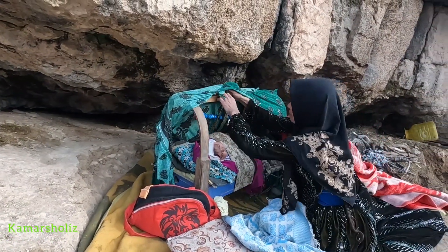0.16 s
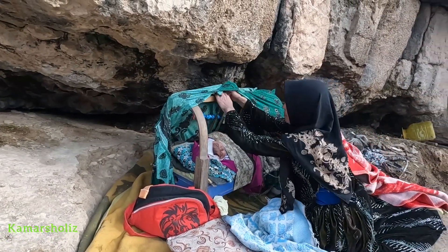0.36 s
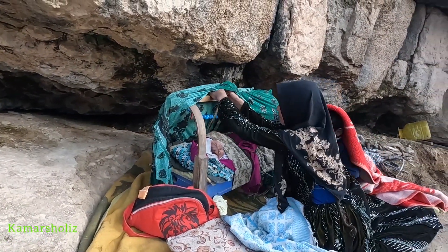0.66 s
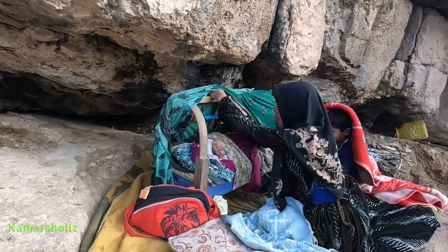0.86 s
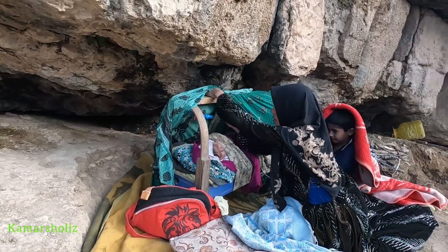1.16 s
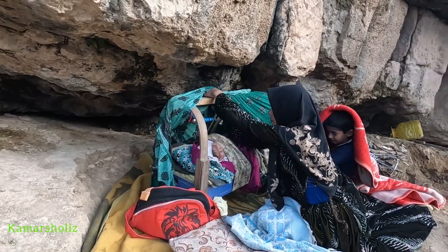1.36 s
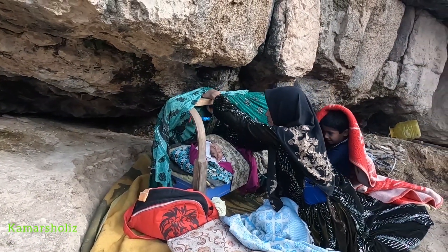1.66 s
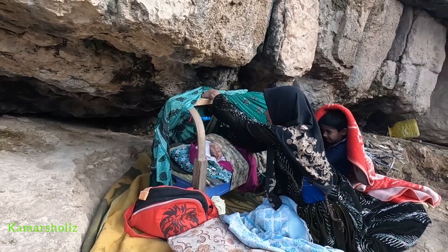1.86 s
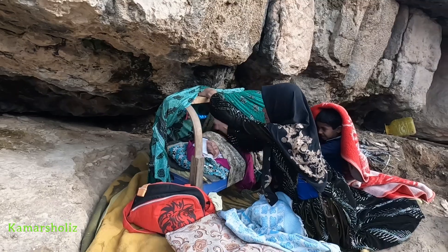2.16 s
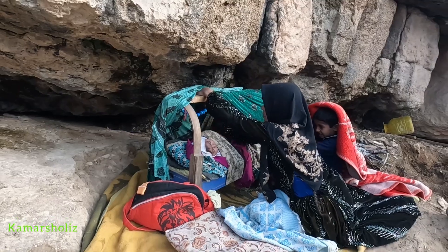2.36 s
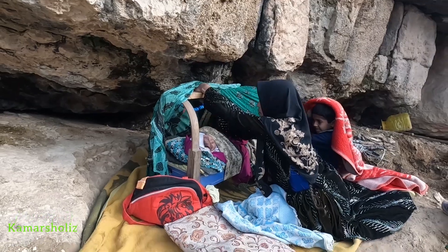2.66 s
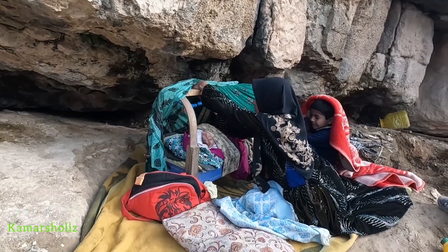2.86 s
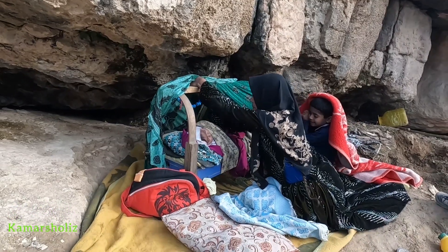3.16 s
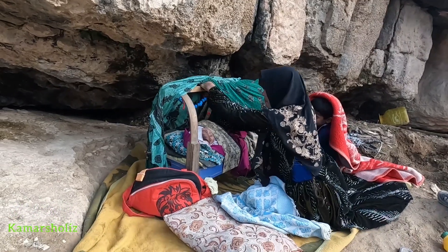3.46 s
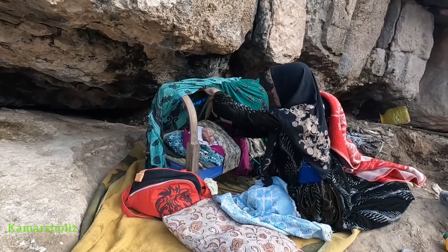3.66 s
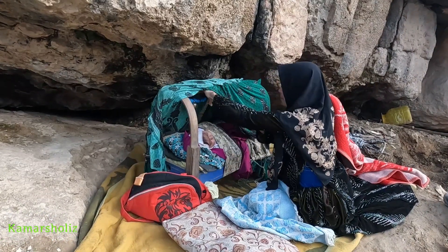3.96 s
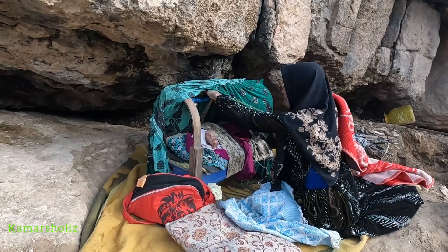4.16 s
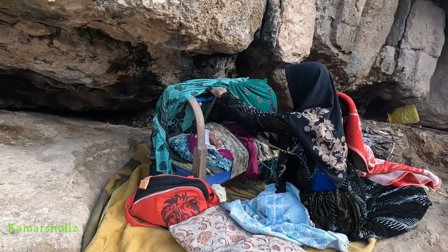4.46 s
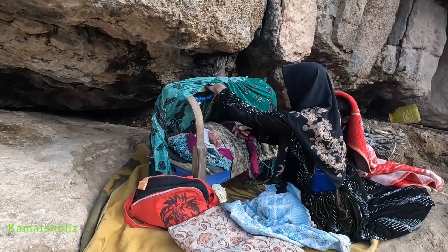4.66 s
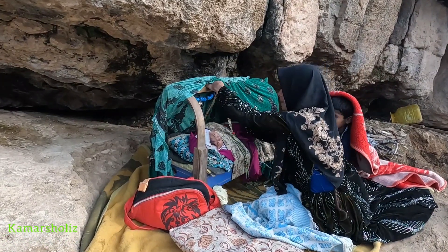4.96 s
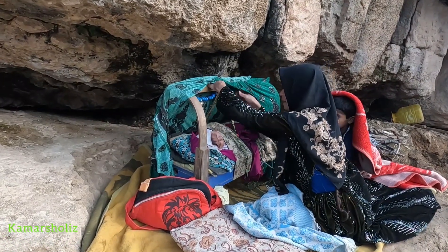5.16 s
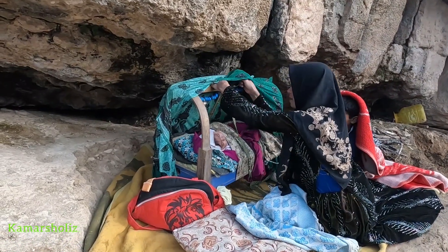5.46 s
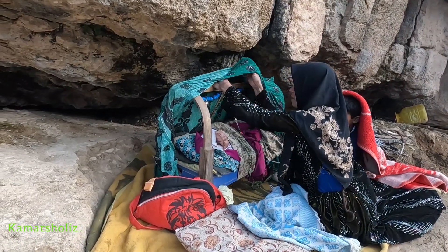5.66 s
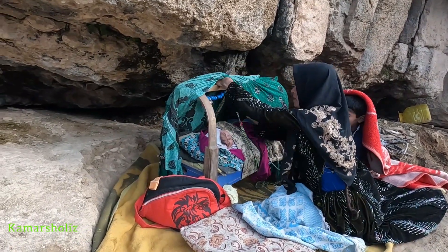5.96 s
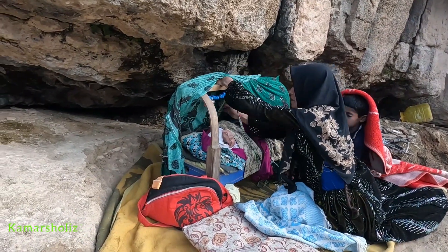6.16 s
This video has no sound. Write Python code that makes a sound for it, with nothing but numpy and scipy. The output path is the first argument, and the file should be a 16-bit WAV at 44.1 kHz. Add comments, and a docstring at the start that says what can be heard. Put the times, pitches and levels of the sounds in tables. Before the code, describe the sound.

A small brass bell clinks brightly in handling hands, wooden frame knocks and small hard clacks around it, cloth rustling, wind rumbling among rocks.

```python
"""Outdoors among rocks, a small brass bell swings in someone's hands.
The clapper rings five split partials, each a pair of beating sines, and fingers choke some blows.
A wooden frame knocks with a pop and ringing modes, small hard things clack as short tones with scratch,
and soft low thumps are decaying sines. Cloth rustles in jerks of filtered noise, the rocks return a short
tail, wind rumbles and puffs on the two microphone ports, and a far hiss lies under it all."""
import sys
import numpy as np
from scipy import signal
from scipy.fft import rfft, irfft
from scipy.io import wavfile
from scipy.ndimage import uniform_filter1d

SR = 44100
rng = np.random.default_rng(int(sys.argv[2]) if len(sys.argv) > 2 else 0)


def int16_out(signal):
    """Quantize to a 16-bit WAV file."""
    q = np.round(np.clip(np.atleast_2d(signal).T, -1, 1) * 32767)
    wavfile.write(sys.argv[1], SR, q.astype(np.int16))


N = 278271  # length [samples]

# cloth movement: (time [s], level [dB], level of its treble [dB], level of the duller rub under it [dB])
RUSTLE = [(0.0, -59, -58.5, -78), (0.24, -76, -75.5, -74), (0.77, -79, -73, -78), (1.12, -71.5, -69.5, -74),
          (1.56, -75.5, -82, -81), (1.76, -59.5, -94, -80), (1.98, -72, -75, -95), (2.16, -75, -60, -66),
          (2.32, -65, -61.5, -69.5), (2.48, -56, -53, -72), (2.58, -58, -68, -64),
          (2.92, -72.5, -81, -92.5), (3.23, -75.5, -73, -77), (3.64, -59.5, -62.5, -64.5),
          (3.81, -53.5, -58.5, -63.5), (4.04, -55, -62.5, -69.5), (4.24, -62.5, -64, -76),
          (4.44, -71, -82, -71), (4.66, -76, -77.5, -80), (4.94, -78.5, -80.5, -79),
          (5.29, -72, -79.5, -68), (5.71, -80, -82, -73), (5.87, -63, -66, -67), (5.99, -56.5, -71, -62.5),
          (6.13, -59.5, -63, -79), (6.31, -63, -64, -66)]


def undb(db):
    """Turn decibels into gain."""
    return 10 ** (np.asarray(db) / 20)


def unit(x):
    """Scale to an RMS of 1, over all channels together."""
    return x / np.sqrt(np.mean(x ** 2))


def sides(pan_db):
    """Left and right gains from a left minus right difference [dB]."""
    return undb(np.array([pan_db, -pan_db]) / 2)


def curves(table):
    """Draw each column of a table as a line over the whole scene."""
    s, *columns = np.transpose(table)
    return [np.interp(np.arange(N) / SR, s, column) for column in columns]


def colour(x, points):
    """Shape the spectrum by (frequency [Hz], gain [dB]) points."""
    hz, db = np.transpose(points)
    f = np.arange(x.shape[-1] // 2 + 1) * SR / x.shape[-1] + 1
    gain = undb(np.interp(np.log(f), np.log(hz), db))
    return irfft(rfft(x) * gain, x.shape[-1])


def fade(t, t60):
    """Exponential decay by 60 dB in t60 seconds, never under 3 ms."""
    return undb(-60 * t / np.maximum(t60, .003))


def walk(rate):
    """Random levels, rate of them per second, joined by straight ramps; RMS near 1."""
    k = int(SR / rate)
    steps = np.repeat(rng.standard_normal(N // k + 1), k)
    return unit(uniform_filter1d(steps, k)[:N])


def add(out, s, sound, pan_db):
    """Mix a short sound in at time s."""
    i = max(int(s * SR), 0)
    sound = sound[:N - i]
    out[:, i:i + len(sound)] += sides(pan_db)[:, None] * sound


def bell():
    """Each blow stills the old ring and starts beating twins, whose mix shifts as the bell spins."""
    # clapper blows: (time [s], finger damping [dB/s, sign ignored], spin of the bell [turns/s],
    # then level [dB] and lean [turns] for each of the four lower pairs, left minus right [dB])
    # the lean is where the blow falls on the rim: 0 rings the lower twin alone, +-.25 the upper one
    strikes = [(0.0, -5, 0.13, -46.5, 0.23, -35.5, -0.22, -46.2, 0.22, -49.5, -0.34, 0),
               (1.176, 391, -0.89, -19.5, -0.19, -10, -0.13, -19, -0.17, -33.5, 0.085, 0),
               (1.265, 122, -0.052, -37, 0.13, -28.5, 0.17, -33.6, 0.022, -40, -0.35, 1.0),
               (1.344, 80.0, 0.1, -44.5, 0.213, -33.5, 0.18, -40, -0.21, -49.5, 0.15, 1.5),
               (1.44, 68, 0.022, -58, 0.225, -37, 0.16, -54.5, 0.16, -67, 0.28, 1.4),
               (1.599, -3, -0.15, -37, -0.17, -24.5, 0.064, -32.5, 0.0051, -35, 0.238, 1),
               (1.895, 2, -0.23, -62.5, -0.076, -37.5, 0.022, -50, 0.25, -53.5, 0.43, 1),
               (2.141, -2, -0.1, -51.5, 0.13, -38, -0.075, -48, -0.04, -55, -0.21, 4),
               (2.197, 61, -0.13, -47, -0.27, -33, -0.17, -42.5, -0.18, -46, -0.24, 1.5),
               (2.373, 400.0, 0.27, -47, 0.02, -25.5, -0.064, -35, -0.025, -39.5, -0.15, 1),
               (2.494, 80.0, -0.49, -44.5, 0.077, -36, -0.162, -40.5, 0.11, -51.0, 0.05, 0),
               (2.578, 400.0, -0.66, -33.5, 0.036, -17.3, -0.17, -19, -0.18, -33, 0.047, 1.5),
               (2.638, 265, -0.052, -38.5, -0.14, -24, -0.21, -33, -0.21, -40.5, -0.037, 3.5),
               (2.721, 80.0, -0.26, -57, 0.13, -46, -0.21, -53.5, -0.21, -58, -0.187, 3.5),
               (2.85, 186, 0.14, -65, 0.188, -35.5, -0.047, -48.5, -0.063, -60, 0.0024, 1),
               (2.984, 1, -0.11, -75, -0.25, -76.5, -0.32, -72.5, 0.054, -75, -0.025, 7.5),
               (3.645, 41, 0.18, -53, -0.36, -40, 0.14, -42, -0.28, -56, 0.225, -1.4),
               (3.996, 28, 0.3, -43.5, 0.17, -37.5, -0.0011, -52.5, 0.078, -61.5, 0.013, 1.7),
               (4.192, 20, 0.13, -39, -0.25, -33, 0.14, -43.5, -0.25, -38, -0.25, 1.5),
               (4.602, 50, -0.016, -55.5, -0.22, -31.5, -0.24, -44.5, -0.23, -45.5, -0.01, -1),
               (5.085, 261, 0.086, -49.5, 0.087, -52.5, -0.3, -62, 0.1, -77, 0.0, -0.5),
               (5.22, 904.5, 0.33, -31, -0.43, -23, -0.39, -31.5, -0.187, -32, 0.077, -0.1),
               (5.343, 598, -0.29, -35.5, 0.0, -23.5, -0.0039, -26.5, 0.033, -37.5, -0.14, 0),
               (5.403, 900.0, -0.0, -50, 0.025, -22, -0.17, -30, 0.058, -45, -0.125, -2.1),
               (5.43, 900.0, 0.45, -58, 0.1, -33, -0.26, -35.5, 0.19, -45, 0.041, -2.5),
               (5.469, 902, -0.0, -57, -0.22, -42, 0.13, -43, 0.23, -44.5, -0.16, 2),
               (5.676, -1.5, -0.0, -49, -0.015, -56.5, 0.028, -54, -0.25, -74, 0.2, -0.5),
               (5.765, 55.0, -0.0, -43, 0.22, -51, -0.3, -56.5, -0.043, -80, 0.125, -1.0),
               (5.796, 40, -0.16, -37, -0.11, -27.5, -0.093, -28, 0.025, -36.5, -0.2, -1.5),
               (5.886, 6, -0.25, -37.5, -0.12, -22.5, -0.25, -32.5, -0.031, -44.5, -0.22, -0.5),
               (6.051, 10.0, -0.12, -32, 0.22, -23.5, -0.061, -27, -0.2, -35.5, -0.28, -0.5),
               (6.231, 13, 0.016, -45, 0.2, -26, -0.011, -32.5, 0.038, -46, 0.027, -1.5)]
    # split partials: (lower twin [Hz], upper twin [Hz], t60 [s], waves round the rim, extra left minus right [dB])
    twin_modes = [(2105.5, 2149.5, .9, 2, 0.5), (5827, 5839.5, 1.6, 3, 0), (9275, 9293.5, .6, 4, 4),
                  (10518, 10555, .52, 5, 6), (13440, 13480, .42, 5, 5)]
    # weak single partials: (frequency [Hz], level against the top pair's drive [dB], t60 [s])
    single_modes = [(7180, -12, .1), (7510, -10, .1), (11550, -14, .1), (12050, -12, .12),
                    (12210, -12, .15), (12310, -7, .2), (12480, -6, .12), (12620, -12, .1), (14090, -4, .3),
                    (14708, -3, .45), (14725, -7, .35)]
    # clapper contact: (frequency [Hz], gain [dB])
    tick_colour = [(1300, -17), (2200, -3), (4000, -9.5), (7000, 3.5), (11000, -8), (13000, -20),
                   (15500, -44)]
    # loose ring and chain: (frequency [Hz], gain [dB])
    jangle_colour = [(1500, -24.5), (2500, 1.5), (4500, -9.5), (7500, -6.5), (10000, -25), (12300, 8.5),
                     (13500, -30), (15500, -40)]
    # the mouth of the swinging bell turns to the microphone and away: (time [s], level [dB])
    mouth = [(0.05, 1.5), (.15, -0.5), (.27, -3), (.4, -15), (1.3, 1.5), (1.47, -1), (1.56, 0), (1.62, 0.5),
             (1.67, 1.5), (1.75, -2), (1.85, -6.5), (1.97, 3), (2.1, -1.5), (2.25, 1), (2.33, 1),
             (2.5, 0.5), (3.7, 0.5), (3.85, -7.5), (4.08, 2), (4.27, -6.5), (4.42, -2.5), (4.56, 2.5),
             (4.72, -1.5), (4.9, 3.5), (5.1, -2), (5.8, -2), (5.9, -2), (5.96, 0), (6.03, -3), (6.11, -3),
             (6.2, -2), (6.3, -0.5)]
    # unsteadiness of each pair, more for finer lobes: (one RMS level per pair [dB])
    flicker = (1, 1, 1.5, 2, 2.2)
    tick_db, tick_t60_s, jangle_db, jangle_t60_s = 11, 0.028, 6.5, 0.11
    waver = 0.00064  # RMS share by which the swing bends the pitch
    free_db = -31  # part of the ring that the fingers do not reach
    rise_s, choked_rise_s = 0.0011, 0.0016  # a free blow; added for each 500 dB per s of finger damping
    top_share, top_pair_db = 0.82, -13  # top pair: share that follows the fourth, the rest the third; offset

    out = np.zeros((2, N))
    swell_db = curves(mouth)[0]
    facing = undb([swell_db + db * walk(22) for db in flicker])
    bend = np.cumsum(waver * walk(5.5)) / SR
    ends = [row[0] for row in strikes[1:]] + [N / SR]
    for (s, grip_db, spin, *pairs, pan_db), end in zip(strikes, ends):
        t = np.arange(int((end - s + .002) * SR)) / SR  # rings on 2 ms into the next blow
        now = np.clip(int(s * SR) + np.arange(len(t)), 0, N - 1)
        turns = 2 * np.pi * (t + bend[now] - bend[now[0]])  # radians per Hz
        grip = undb(-abs(grip_db) * t) + undb(free_db)
        rise = np.clip(t / (rise_s + choked_rise_s * abs(grip_db) / 500), 0, 1)
        window = grip * rise * np.clip((t[-1] - t) / 0.005, 0, 1)

        # the top pair takes its level from the third and fourth, its lean from the fourth
        top_db = top_share * pairs[6] + (1 - top_share) * pairs[4] + top_pair_db
        pairs = pairs + [top_db, pairs[-1]]
        for (low, high, t60, waves, left_db), db, place, lobe in zip(twin_modes, pairs[::2], pairs[1::2], facing):
            lean = 2 * np.pi * (place + waves * spin * t)
            twins = np.cos(lean) * np.sin(low * turns) + np.sin(lean) * np.sin(high * turns)
            add(out, s, undb(db) * twins * fade(t, t60) * window * lobe[now], pan_db + left_db)

        hard = undb(top_db)  # the harder the blow, the stronger the top of the bell
        singles = sum(undb(db) * np.sin(hz * turns) * fade(t, t60) for hz, db, t60 in single_modes)
        add(out, s, hard * singles * window * facing[-1][now], pan_db + 3)

        # a tick and a short jangle mark the contact, except for the ring at time 0
        t = np.arange(8192) / SR
        tick = unit(colour(rng.standard_normal(len(t)), tick_colour))
        jangle = unit(colour(rng.standard_normal(len(t)), jangle_colour))
        contact = undb(tick_db) * tick * fade(t, tick_t60_s)
        contact = contact + undb(jangle_db) * jangle * fade(t, jangle_t60_s)
        add(out, s, undb((pairs[4] + pairs[6]) / 2 - 16.0) * contact * (s > 0), pan_db)
    return out


def frame():
    """A round pop, then the wooden modes ring in a mix of their own for each knock."""
    # knocks: (time [s], level [dB], brightness [dB per octave of mode pitch], hollow tone [dB], hollow tone [Hz])
    knocks = [(0.187, -45, -3.5, 9, 1385), (0.525, -59.5, 3, 6, 1390), (1.138, -52, 10, -7, 1480),
              (2.124, -36, 0.5, -25, 1370), (2.178, -22, 1, -25, 1420), (2.505, -36, -1.5, 3, 1360),
              (2.52, -23.5, 4.5, -10, 1364), (3.252, -55.5, -4, 10.5, 958), (3.756, -39, 14, -6, 1330),
              (3.909, -43.5, -6, -12, 1310), (4.393, -34.5, -0.5, -0.5, 1464), (4.406, -35, -2, 4, 1390),
              (4.448, -43, 1, 11, 1343), (5.097, -46, 1, -3, 874), (5.164, -45.5, 4.5, 1.5, 1406),
              (5.239, -44.5, 3, -6, 1270), (5.298, -49, 13, 4, 1360), (5.401, -20.5, 4.5, 4.5, 1392),
              (5.442, -28.5, 0.5, 5.5, 1376), (5.478, -39.5, -2, 5.5, 1350), (5.572, -51.5, 3.5, 8.5, 1410),
              (5.674, -49, -4, 9, 1450), (5.694, -40, 6.5, 0, 1344), (5.736, -39, 2.5, -7, 875),
              (5.784, -27.5, 5, 1, 1417), (5.793, -34.5, -1.5, -4, 1390), (5.886, -16.5, 2.5, -4.5, 1210),
              (5.914, -27, 0.5, 3, 1383), (6.049, -43, 9, -4.5, 1414), (6.08, -38.5, 2, -1.5, 1420)]
    # wooden modes before each knock's variation: (frequency [Hz], level [dB], t60 as a share of the knock's)
    modes = [(183.8, -9.5, 2.4), (238.4, -6, 1.32), (445, -10, 1.47), (705, -22, 0.92),
             (882.6, -13.5, 1.95), (1143, 1, 0.47), (1238, -4.5, 1.2), (1540, 15, 0.11),
             (1836, -46.5, 0.26), (2670, -39.5, .3), (3500, -13.5, 0.33)]
    knock_t60_s, hollow_longer = 0.047, 0.03  # base decay; share by which each dB of hollow tone lengthens it
    ring_db, knock_pan_db = -4, 0  # ring against the first pop; left minus right

    out, t = np.zeros((2, N)), np.arange(8192) / SR
    hz, db, share = np.transpose(modes)[:, :, None]
    chance = rng.standard_normal((len(knocks), len(modes), 2))
    for (s, peak_db, bright_db, hollow_db, hollow_hz), c in zip(knocks, chance):
        t60 = knock_t60_s * (1 + hollow_longer * hollow_db)
        pop_hz = 1200 * undb(.3 * bright_db)
        pop = np.sin(2 * np.pi * pop_hz * (t - .0012)) * np.exp(-((t - .0012) / .0006) ** 2)

        # brightness tilts the modes about 1.2 kHz; chance shifts their levels and pitches
        gains = undb(db + bright_db * np.log2(hz / 1200) + 0.69 * c[:, :1])
        tones = np.sin(2 * np.pi * hz * (1 + 0.019 * c[:, 1:]) * t)
        ring = (gains * tones * fade(t, t60 * share)).sum(axis=0)
        hollow = np.sin(2 * np.pi * hollow_hz * t) * np.exp(-(t / (0.25 * t60)) ** 2)
        ring = ring + undb(hollow_db) * hollow
        tail = colour(rng.standard_normal(len(t)),
                      [(300, -40.5), (800, -8.5), (1600, 2.5), (4000, -12), (12000, -34)])
        ring = ring / 2 + undb(-2.5) * unit(tail) * fade(t, 0.7 * t60)
        knock = pop + undb(ring_db) * ring * np.clip(t / 0.0034, 0, 1)
        add(out, s, undb(peak_db) * knock, knock_pan_db)
    return out


def clacks():
    """A tone with two neighbours and a scratch holds while the pieces chatter, then drops to a faint tail."""
    # small hard clacks: (time [s], level [dB], pitch [Hz], scratch against the tone [dB])
    hits = [(0.012, -35.5, 3260, -12), (.081, -37, 3440, -6.5), (.199, -53.5, 3500, 0),
            (.2714, -57.5, 2420, -11), (1.175, -33, 2440, -4), (1.271, -45, 2730, 2),
            (1.317, -48, 2390, 1.5), (1.34, -55, 2600, 5.5), (1.561, -47.5, 2270, -5),
            (1.682, -56, 2330, -9), (1.6906, -48, 3280, -9), (1.726, -61, 3300, -18),
            (1.7354, -20, 3310, -14), (1.744, -33, 3200, -12), (1.7743, -58, 3260, -3),
            (1.781, -49, 2690, -6), (1.794, -50, 3250, 1), (1.9055, -55, 2370, -3), (2.105, -56, 2460, 1),
            (2.1505, -41.5, 2670, 1), (2.1645, -41.5, 2690, 1), (2.193, -48, 2900, 4),
            (2.2004, -44.5, 2750, 2), (2.21, -43, 2920, -1), (2.258, -47.5, 2470, 4),
            (2.324, -50.5, 4270, -7), (2.375, -45.5, 2350, -9), (2.389, -39, 3300, -7),
            (2.3967, -25, 3347, -9.5), (2.5094, -44, 2650, 0), (2.5341, -38, 3110, -1),
            (2.5676, -33, 3330, -6), (2.6346, -37.5, 2220, -7), (2.654, -44, 3380, -1),
            (2.761, -50.5, 2360, 6.5), (2.793, -51, 2450, -0.5), (2.82, -53.5, 2410, 3.5),
            (2.8465, -46, 2160, -7), (2.949, -53.5, 2470, 0.5), (3.002, -57, 3010, 4.5),
            (3.6417, -50.5, 2344, -2), (3.659, -52, 2810, 7), (3.7276, -44, 3250, -4),
            (3.7456, -46, 3070, 6), (3.7593, -34, 3080, -1), (3.901, -39, 2950, -13),
            (3.974, -48, 3420, -2), (3.9938, -41.5, 2770, -5), (4.0113, -45, 3400, -9),
            (4.047, -56, 2400, 1), (4.098, -41, 3330, -8), (4.106, -49, 3500, -4),
            (4.1364, -43.5, 3210, -7), (4.151, -44.5, 2950, -1), (4.3926, -43, 2620, -4.5),
            (4.461, -50.5, 2740, -8), (4.483, -49, 2450, -8.5), (4.501, -49, 2780, -8),
            (4.569, -50, 2920, -8.5), (4.5956, -52, 2811, 1.5), (4.87, -63, 2720, -0.5),
            (5.084, -51, 2730, 1), (5.099, -47.5, 2480, 4), (5.3176, -55, 2980, 5), (5.329, -49, 2300, 1),
            (5.442, -41.5, 2880, 1.5), (5.469, -48, 2370, 0), (5.616, -55, 2670, -11.5),
            (5.675, -40.5, 2410, 7), (5.6999, -40.5, 2830, 2.5), (5.713, -41.5, 2310, -0.5),
            (5.769, -45, 2950, 3), (5.7838, -38.5, 2350, 3), (5.826, -43, 2830, -10),
            (5.883, -26.5, 3430, -3.5), (5.959, -49, 2600, -4), (5.992, -45.5, 2740, -9),
            (6.048, -31.5, 2460, -1), (6.131, -53, 2320, 1), (6.153, -45, 2900, -5), (6.174, -54, 2370, -4),
            (6.1963, -53, 2720, -7), (6.2275, -42, 2940, 1)]
    hold_s, clack_pan_db = 0.0064, -.4
    patter_per_s, patter_db, patter_scratch_db = 9, 9, -3.5  # faint chance clacks; loudest level over the cloth

    out, t = np.zeros((2, N)), np.arange(4096) / SR
    when, size, pitch = rng.random((100, 3)).T
    when = np.cumsum(-np.log(1 - when)) / patter_per_s
    cloth_db = np.interp(when, *np.transpose(RUSTLE)[:2])
    chance = zip(when, cloth_db + patter_db - 8 * size, 2300 + 700 * pitch)
    patter = [(*row, patter_scratch_db) for row in chance if row[0] < N / SR]
    for s, peak_db, hz, scratch_db in hits + patter:
        tone = np.sin(2 * np.pi * hz * t)
        tone = tone + 0.18 * np.sin(2 * np.pi * .75 * hz * t) + 0.25 * np.sin(2 * np.pi * 1.21 * hz * t)
        scratch = unit(colour(rng.standard_normal(len(t)),
                              [(1200, -29.5), (2500, 3.5), (4500, -12.5), (6500, -7), (9000, -16.0),
                               (11500, -23), (15500, -56.5)]))
        shape = np.exp(-(t / hold_s) ** 2) + 0.041 * fade(t, 0.079)
        shape = shape * np.clip(t / 0.0017, 0, 1)
        add(out, s, undb(peak_db) * (tone + undb(scratch_db) * scratch) * shape, clack_pan_db)
    return out


def thumps():
    """Padded blows: a few low cycles that die away after a brief rise."""
    # soft low thumps: (time [s], level [dB], pitch [Hz])
    blows = [(1.321, -34, 130), (3.906, -60, 136), (3.929, -39, 124), (4.229, -62, 101),
             (4.398, -43.5, 222), (4.48, -41.5, 98.5), (5.03, -56, 137.5)]
    out, t = np.zeros((2, N)), np.arange(4096) / SR
    for s, peak_db, hz in blows:
        shape = fade(t, 0.058) * np.clip(t / 0.00069, 0, 1)
        add(out, s, undb(peak_db) * np.sin(2 * np.pi * hz * t) * shape, 0)
    return out


def cloth():
    """Fibres slip in dense uneven grains, with lone crackles, a duller rub and swishes; mostly from one place."""
    # colour of the grains: (frequency [Hz], relative level per Hz [dB])
    grain_colour = [(240, -66), (400, -14.5), (1260, -13.5), (1630, -14), (2120, 6.5), (3970, -1.5),
                    (6000, -7), (9650, -25.5), (14800, -35.5), (15500, -62.5)]
    # quick swishes: (time of the peak [s], level [dB], half length to 1/e [s])
    swishes = [(0.05, -75, 0.045), (1.213, -55.5, 0.032), (1.33, -64, .03), (2.107, -56, 0.0087),
               (2.18, -54, 0.057), (2.323, -55, 0.014), (2.468, -54, 0.015), (2.525, -52, 0.021),
               (3.76, -51, 0.013), (3.933, -56.5, 0.023), (5.098, -55, .012), (5.32, -59, .015),
               (5.714, -53, 0.04), (6.155, -66, 0.013)]
    jerk_db, jerks_per_s = 1.5, 28  # the cloth moves in jerks

    db, treble_db, rub_db = curves(RUSTLE)
    grains = rng.standard_normal((2, N)) * undb(2.0 * walk(120) + jerk_db * walk(jerks_per_s))
    # about 250 crackles per second
    crackle = (rng.random(N) < 250 / SR) * rng.standard_normal(N) * undb(3 * rng.exponential(size=N))
    crackle = colour(crackle, [(1200, -66), (2300, -26.0), (3600, -5.0), (5500, -21.5), (11000, -71)])
    rub = colour(rng.standard_normal(N),
                 [(600, -45), (1150, -10), (1370, -4.5), (1700, -8), (3000, -37.5), (8000, -94)])

    mid, side = colour(grains, grain_colour)
    both = unit(mid) + 0.27 * unit(side) * np.array([[1], [-1]])
    treble = colour(both, [(4000, -30), (7000, 0)])
    swish = sum(undb(d) * np.exp(-((np.arange(N) / SR - s) / half) ** 2) for s, d, half in swishes)
    broad = unit(colour(both, [(2000, -2.5), (4000, 0.5), (7000, 5.5), (11000, 12.0)]))
    body = undb(db) * (unit(both - treble) + 0.25 * unit(crackle))
    return swish * broad + body + undb(treble_db) * unit(treble) + undb(rub_db) * unit(rub)


def wind():
    """Eddies press on the ports, partly alike on both: a deep part and an upper part, both buffeted alike."""
    # gusts: (time [s], level [dB], upper part against that [dB], left minus right [dB])
    gusts = [(0.0, -55.5, -3, 11), (0.03, -47.5, -11, 1.5), (0.84, -37.5, -22, -3), (1.0, -47, -15.5, -2),
             (1.37, -31, -14, -1.5), (1.63, -38, -16.5, 3.5), (2.14, -41.5, -20.5, -10),
             (2.28, -45, -11.5, -1.5), (3.04, -53.5, -17.5, -6.5), (3.3, -49, -15, -2),
             (3.76, -51.5, -6.5, -8.0), (3.8, -39, -21, -7), (4.01, -49, -10.5, -2.5),
             (4.55, -39.5, -15.5, -5), (4.71, -46.5, -21, -10.5), (4.78, -44, -17.5, -3.5),
             (5.01, -39.5, -15, -4), (5.11, -50.5, -21, -1), (5.36, -38.5, -17, -7.5),
             (5.5, -57, -12.5, -1), (5.68, -42.5, -22, -6), (5.87, -44.5, -10.5, -5.5),
             (6.26, -54.5, -14.5, -7), (6.31, -48, 7, -13)]
    buffet_db, buffet_per_s, veer_db = 1, 9, 3  # RMS level sway and its rate; RMS sway between the sides

    db, upper_db, pan_db = curves(gusts)
    shared, left, right = rng.standard_normal((3, N))
    ports = np.array([left, right]) + .95 * shared
    ports = ports * undb(1.8 * walk(14))  # buffets reach both parts at once
    deep = unit(colour(ports, [(10, -7.5), (26, 8.0), (45, -4.0), (70, -25.5), (120, -64.5), (300, -94),
                               (2000, -160)]))
    upper = unit(colour(ports, [(20, -63.0), (45, -16), (75, 4.0), (130, -8.5), (250, -19), (450, -34.5),
                                (900, -44), (3000, -140)]))
    level = undb(db + buffet_db * walk(buffet_per_s))
    return level * sides(pan_db + veer_db * walk(8.9)) * (deep + undb(upper_db) * upper)


def puffs():
    """A single eddy hits the ports: one dip of pressure between two shoulders."""
    # eddies: (time of the dip [s], depth of the dip [dB], width [s], left minus right [dB])
    eddies = [(0.806, -35.5, 0.0068, 2), (1.205, -34, 0.0063, 14), (1.338, -28.5, 0.0067, 14),
              (1.385, -33, 0.0078, 13), (1.456, -29, 0.0067, 6), (1.698, -35, 0.0067, 12),
              (3.356, -46, 0.019, 14), (3.806, -34, .007, -0.5), (3.86, -36, 0.0077, -2),
              (4.235, -35, 0.0052, -6), (4.489, -29.5, 0.0051, -4), (4.571, -35, 0.0059, -4),
              (4.6, -36.5, 0.0047, -3), (4.917, -33, 0.0044, -3), (5.015, -32.5, 0.0051, -4.5),
              (5.28, -33.5, 0.0095, -10), (5.305, -33, 0.0088, -6), (5.358, -34, 0.0066, 0),
              (6.066, -39, 0.0045, -4.5), (6.295, -49, 0.0056, -5)]
    out = np.zeros((2, N))
    for s, peak_db, width, pan_db in eddies:
        u = np.arange(-4 * width, 4 * width, 1 / SR) / width
        add(out, s - 4 * width, undb(peak_db) * (u ** 2 - 1) * np.exp(-u ** 2 / 2), pan_db)
    return out


def air():
    """Faint far hiss: wide coloured noise that swells slowly."""
    # colour of the hiss: (frequency [Hz], relative level per Hz [dB])
    hiss_colour = [(120, -52.5), (200, 3.5), (236, -12), (304, -5.5), (665, -13.5), (1110, -14.5),
                   (1980, -12.5), (2380, -24.5), (7220, -20.5), (15500, -45)]
    hiss_db = -71
    mid, side = colour(rng.standard_normal((2, N)), hiss_colour)
    return undb(hiss_db + 0.48 * walk(2)) * unit(mid + 0.81 * side * np.array([[1], [-1]]))


def rocks(near):
    """The rock faces return a short, dull, scattered tail: decaying noise convolved with the near sounds."""
    rock_db, rock_t60_s = -15.5, 0.13
    t = np.arange(SR // 2) / SR
    echo = colour(rng.standard_normal((2, len(t))), [(1000, 2.0), (4000, -2), (14000, -10.0)])
    echo = echo * fade(t, rock_t60_s) * (t > .004)  # nothing returns in the first 4 ms
    echo = echo / np.sqrt(np.sum(echo ** 2) / 2)
    return undb(rock_db) * signal.fftconvolve(near, echo, axes=1)[:, :N]


def scene():
    """Near sounds and their return from the rocks, with cloth, wind and air."""
    near = bell() + frame() + clacks() + thumps()
    return near + rocks(near) + cloth() + wind() + puffs() + air()


def record(dry):
    """The left port trails the right by a phase that varies with frequency; the top is cut."""
    # phase by which the left port trails: (frequency [Hz], lag [radians])
    port_lag = [(30, 0), (300, .3), (800, .5), (2100, .4), (3300, .6), (5800, .4), (7500, .2), (10500, .3),
                (12400, 2.3), (13450, 5.9), (14090, 3.3), (14710, 4.7)]
    top_hz = 15600
    hz, lag = np.transpose(port_lag)
    f = np.arange(N // 2 + 1) * SR / N + 1
    trail = np.exp(-1j * np.interp(np.log(f), np.log(hz), lag))
    left = irfft(rfft(dry[0]) * trail, N)
    low_pass = signal.ellip(8, .2, 60, top_hz, fs=SR, output="sos")
    return signal.sosfilt(low_pass, [left, dry[1]])


dry = scene()
out = record(dry)
int16_out(out)
```